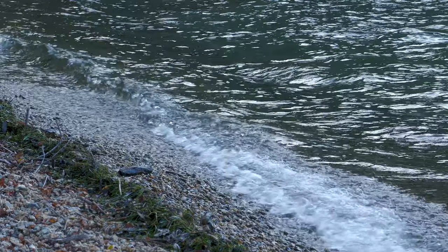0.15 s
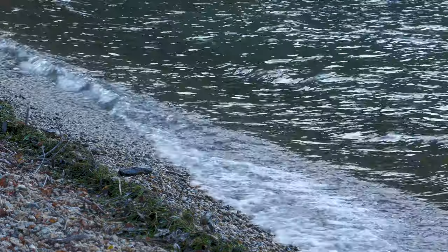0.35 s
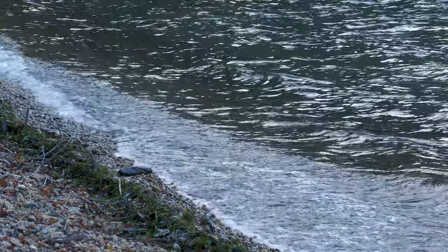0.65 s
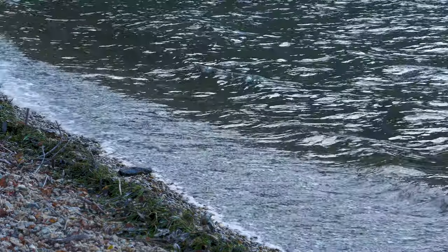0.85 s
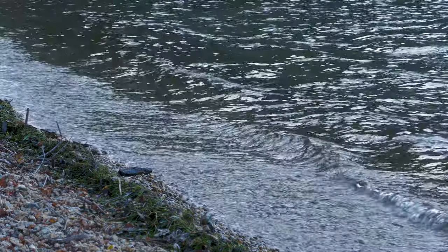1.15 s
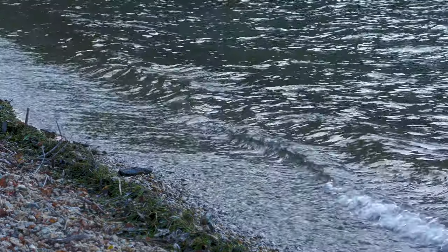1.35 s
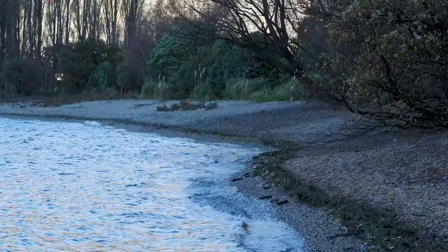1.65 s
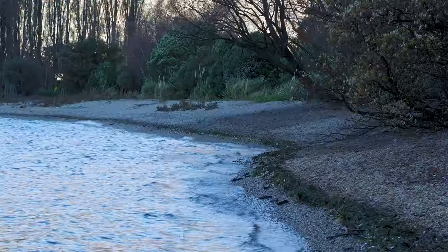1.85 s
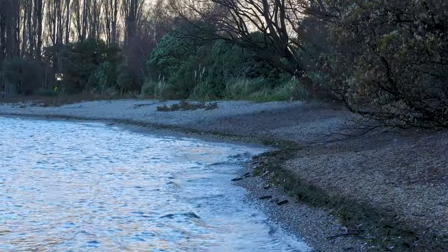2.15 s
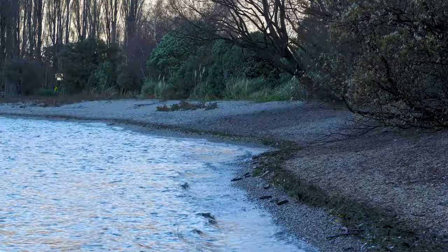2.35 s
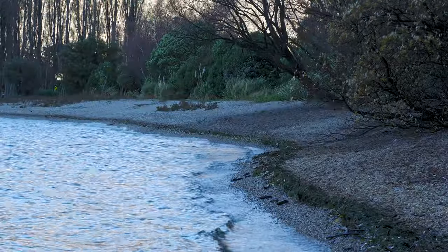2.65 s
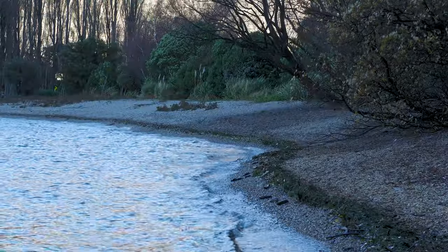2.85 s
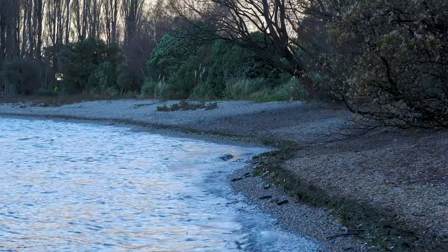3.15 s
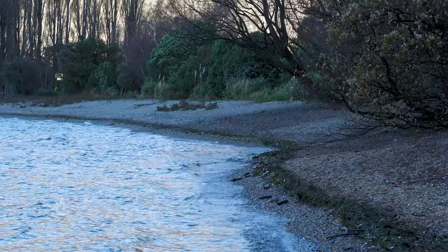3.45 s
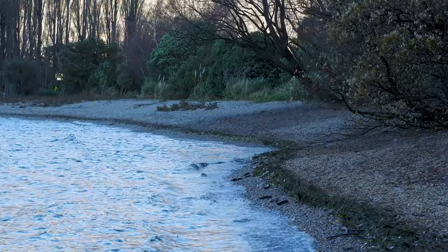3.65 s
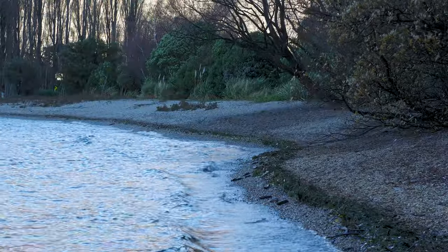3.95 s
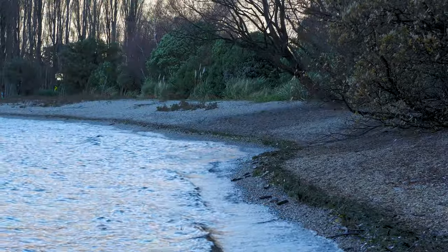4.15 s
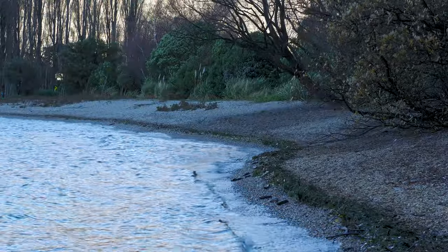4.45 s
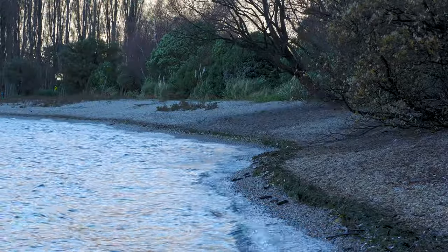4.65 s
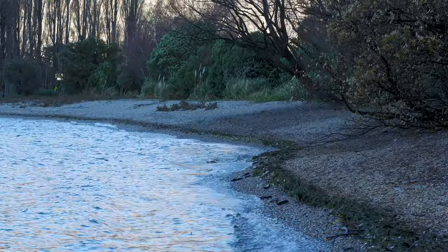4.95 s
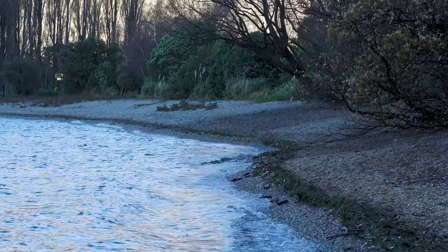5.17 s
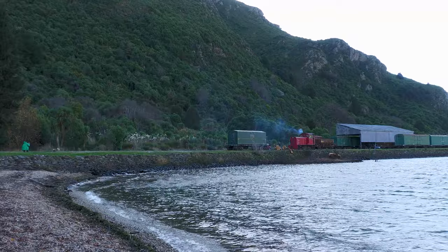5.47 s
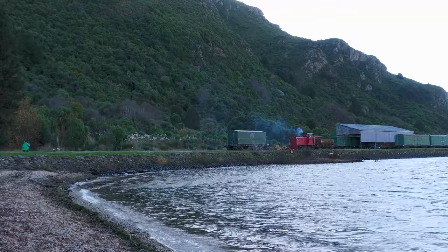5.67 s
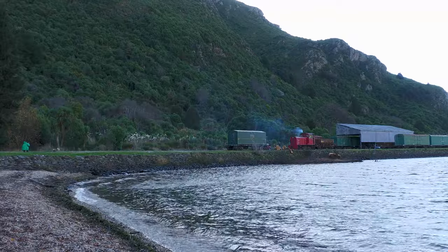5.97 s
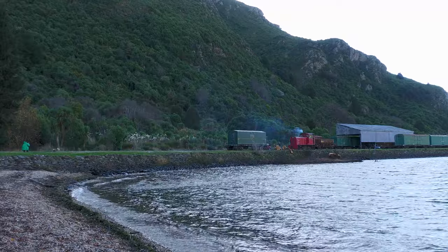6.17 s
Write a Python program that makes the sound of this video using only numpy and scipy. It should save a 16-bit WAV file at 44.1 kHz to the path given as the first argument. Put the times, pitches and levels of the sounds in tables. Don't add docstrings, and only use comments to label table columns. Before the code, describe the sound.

Gentle waves fold, wash up pebbles and fall back in foamy hisses, while deep gusty wind rumbles constantly against the mic.

```python
import sys
import numpy as np
from scipy import signal
from scipy.fft import rfft, irfft, next_fast_len
from scipy.io import wavfile
from scipy.ndimage import uniform_filter1d, map_coordinates

SR = 44100
rng = np.random.default_rng(int(sys.argv[2]) if len(sys.argv) > 2 else 0)


def volts_from_db(level):
    exponent = np.asarray(level, float) / 20
    return 10 ** exponent


def dump(signal):
    limited = np.clip(np.atleast_2d(signal).T, -1, 1)
    pcm = np.round(limited * 32767).astype(np.int16)
    wavfile.write(sys.argv[1], SR, pcm)


N = 278666

# (time [s], slosh level [dB], build-up [s], decay [dB/s])
BREAKERS = [
    (0.02, -33, .3, 13),
    (1.62, -37.5, 0.34, 15),
    (3.0, -39.5, 0.34, 12),
    (4.3, -36, 0.33, 14.5),
    (6.15, -39.5, .45, 18),
]
# (time [s], extra slosh [dB])
SLAPS = [
    (0.1, 1),
    (0.27, 2),
    (0.55, 3),
    (2.97, 1),
    (3.05, 2),
    (4.15, 1),
    (4.32, 4.5),
    (4.58, 3.5),
    (4.66, 3),
    (5.95, 3.5),
]
# (time [s], level [dB])
WASH = [(0.0, -37), (0.56, -41.5), (1.07, -49), (1.35, -47), (1.53, -40.5), (1.9, -42.5), (2.39, -55.5),
        (2.85, -43), (3.01, -42), (3.82, -51), (4.05, -41.5), (4.42, -41), (4.93, -46.5), (5.16, -51.5),
        (5.49, -56), (5.81, -48), (6.27, -44.5), (6.32, -48)]
# (time [s], extra spray [dB], half length [s])
SPLASHES = [(0.05, 1, 0.23), (0.5, 2.5, 0.31), (1.45, 1, 0.045), (1.69, 3.5, .15), (2.8, 4, .04),
            (3.03, 5, .03), (3.99, 4, .05), (4.35, 3.5, 0.12), (4.62, 3.5, 0.045), (4.9, 2.5, .15),
            (5.85, 2, .04), (6.22, 0, .05)]
# (frequency [Hz], density [dB/Hz])
SLOSH_SPECTRUM = [(200, -14), (350, -0.5), (640, 0), (950, -4), (1300, -9), (2000, -33)]
# (frequency [Hz], density [dB/Hz])
FOAM_SPECTRUM = [(700, -4), (1100, -2.5), (1490, -1), (1800, -5), (3480, -7), (4430, -17), (6000, -32),
                 (8000, -55)]
# (frequency [Hz], density [dB/Hz])
SPRAY_SPECTRUM = [(3000, -30), (4500, -3.5), (5500, -1), (7000, -5), (9000, -11), (12000, -28)]
# (frequency [Hz], density [dB/Hz])
MIST_SPECTRUM = [(5500, -23), (8000, -2.5), (10000, 0), (12300, -2), (15700, -7)]
# (frequency [Hz], density [dB/Hz])
FAR_SPECTRUM = [(500, -28), (800, -3), (1100, 0.5), (1450, 3), (1750, -1), (3500, -20.5), (4500, -39)]
# (time [s], peak [dB], frequency [Hz])
DROPS = [(0.1976, -39, 12780), (0.2726, -24, 1950), (0.3976, -45, 6190), (0.5877, -42, 6570),
         (0.9648, -49, 6710), (1.1724, -32, 2190), (1.2661, -42, 5460), (1.4215, -25, 1120),
         (1.8398, -43, 9420), (2.2359, -38, 3420), (2.5053, -36, 686), (2.5881, -46, 5430),
         (2.638, -31, 2920), (2.638, -32.5, 3700), (2.6629, -33, 2070), (2.7642, -39, 7300),
         (2.868, -44, 11750), (3.0062, -40, 6390), (3.0304, -29, 3250), (3.2411, -44.5, 6460),
         (3.6582, -42, 4230), (3.8223, -33, 1050), (3.9301, -34, 3680), (4.1386, -26.5, 646),
         (4.2319, -39, 6200), (4.3113, -22, 520), (4.3218, -20.5, 425), (5.3513, -36, 2460),
         (5.7967, -26.5, 1040), (5.8452, -42, 6450)]
# (time [s], peak [dB])
TICKS = [(0.9632, -39), (1.265, -46), (2.7626, -36), (2.7954, -47), (3.0285, -46), (4.0344, -49),
         (4.3134, -46), (4.6254, -57), (5.8444, -50), (6.2074, -49)]
# (time [s], level [dB])
WIND = [(0.0, -32), (0.28, -31), (0.37, -34), (0.44, -35), (1.37, -34.5), (1.41, -29.5), (2.62, -31),
        (2.66, -37), (2.76, -28), (2.87, -29.5), (3.4, -26), (3.43, -30.5), (3.68, -27), (6.18, -35),
        (6.28, -29.5), (6.32, -38)]
# (time [s], level change [dB])
GUSTS = [(0.3, -1), (0.37, -10), (0.44, 0.5), (0.6, 6), (0.67, -5), (0.88, 3.5), (1.14, -6), (1.25, 5),
         (1.43, 4.5), (1.49, -4), (1.94, 4), (2.69, 8.5), (2.76, 4), (3.11, 3.5), (3.31, -1), (3.43, 2),
         (3.87, -6), (4.08, 2), (4.19, 5), (4.28, 1), (4.87, 3.5), (4.93, -7), (5.01, 7.5), (5.45, -4),
         (5.6, -8), (6.3, 6)]
# (time [s], depth [dB])
LULLS = [(0.44, 0), (0.72, 7), (1.2, 1), (1.37, 2.5), (2.66, -1), (3.82, 4), (4.01, 2.5), (4.14, 2.5),
         (4.52, 4.5), (4.63, 9), (5.23, 0.5), (5.45, 2)]
# (frequency [Hz], density [dB/Hz])
BUFFET_SPECTRUM = [(12, -40), (27, -8.5), (50, -0.5), (85, 7.5), (120, 2), (170, -11.5), (250, -58)]
# (frequency [Hz], density [dB/Hz])
FLUTTER_SPECTRUM = [(70, -55), (120, -1.5), (190, -3), (280, -10.5), (420, -21), (800, -35), (1500, -68)]
# (frequency [Hz], density [dB/Hz])
HISS_SPECTRUM = [(2000, -22), (5000, 2), (10000, -1), (15700, -2)]
# (frequency [Hz], level [dB rms])
WHINE = [(15601, -85), (15649, -85)]

MID_WASH_DB, MID_WIND_DB = -45, -31


def waves():
    wash_db, = curves(WASH)
    flung_db = bumps(SPLASHES)
    slap_db = bumps(SLAPS, half_s=0.027)
    surge = 0.5 * wobble(14) + 0.65 * wobble(45)
    return (slosh(slap_db, surge)
            + foam(wash_db, slap_db, surge)
            + spray(wash_db - MID_WASH_DB, flung_db, surge)
            + mist(wash_db - MID_WASH_DB, flung_db, surge)
            + far_waves())


def slosh(slap_db, surge):
    grains = bubbles(count=4000, low_hz=302.0, high_hz=1390, cycles=3.57, scatter_db=0.7, rise=0.17, size=600)
    body = mixed(patchy(0.28, size=(2, 10)), grains, 0.15)
    level_db = folding() + slap_db + 0.5 + 0.18 * surge
    return volts_from_db(level_db) * coloured(body, SLOSH_SPECTRUM)


def folding():
    climb_db, crest_s = 11.5, 0.21
    t = np.arange(N) / SR
    power = 0
    for s, db, build_s, decay_db_per_s in BREAKERS:
        below_db = np.where(t < s, climb_db * (s - t) / build_s, decay_db_per_s * (t - s))
        power = power + volts_from_db(2 * (db - below_db))
    return uniform_filter1d(10 * np.log10(power), size=int(crest_s * SR), mode="nearest")


def foam(wash_db, slap_db, surge):
    grains = bubbles(count=16000, low_hz=895, high_hz=5030, cycles=4.23, scatter_db=2.5, rise=0.19, size=250)
    body = mixed(patchy(0.73), grains, 0.16)
    level_db = wash_db + 0.23 * slap_db + 3.0 + 0.21 * surge
    return volts_from_db(level_db) * coloured(body, FOAM_SPECTRUM)


def spray(swing_db, flung_db, surge):
    grains = bubbles(count=5000, low_hz=3500, high_hz=9800, cycles=3.6, scatter_db=2.5, rise=0.094, size=100)
    body = mixed(patchy(1.2, size=(20, 3)), grains, 0.15)
    level_db = MID_WASH_DB - 14.5 + 1.18 * swing_db + 0.72 * flung_db
    return volts_from_db(level_db - 3.0 + 1.4 * surge) * coloured(body, SPRAY_SPECTRUM)


def mist(swing_db, flung_db, surge):
    grains = bubbles(count=5000, low_hz=7000, high_hz=16000, cycles=3.7, scatter_db=5.0, rise=.1, size=60)
    body = mixed(patchy(0.99, size=(30, 2)), grains, 0.18)
    level_db = MID_WASH_DB - 21.5 + 1.05 * swing_db + 1.05 * flung_db
    return volts_from_db(level_db - 2.0 + 1.2 * surge) * coloured(body, MIST_SPECTRUM)


def far_waves():
    return volts_from_db(-50.5 + 0.69 * wobble(1.74)) * coloured(patchy(0.29), FAR_SPECTRUM)


def drops():
    shortest_ms, ring_cycles = 0.64, 9.1
    out, t = np.zeros(N + 4096), np.arange(-2048, 2048) / SR
    for s, db, hz in DROPS:
        length_ms = shortest_ms + 1e3 * ring_cycles / hz
        u = t / (length_ms * 0.00025)
        shape = np.exp(-np.where(u < 0, 2.5, .8) * u ** 2)
        bend = 1 + 0.0097 * np.clip(u, -3, 3)
        out[round(s * SR):][:4096] += volts_from_db(db - 1.5) * shape * np.sin(2 * np.pi * hz * t * bend)
    return out[2048:N + 2048]


def cracks():
    out, t = np.zeros(N + 256), np.arange(256) / SR
    for s, db in TICKS:
        out[round(s * SR):][:256] += volts_from_db(db - 2 - 60 * t / .006) * rng.standard_normal(256)
    return signal.sosfilt(signal.butter(4, 6500, "high", fs=SR, output="sos"), out[:N])


def wind():
    wind_db, = curves(WIND)
    gust_db = bumps(GUSTS, half_s=0.041)
    buffet_db = MID_WIND_DB - 2 + 0.56 * (wind_db - MID_WIND_DB) + gust_db
    flutter_db = wind_db + 1.5 + 0.14 * gust_db - bumps(LULLS, half_s=0.023)
    eddies = 0.62 * wobble(16)
    buffet = steady(coloured(rng.standard_normal(N), BUFFET_SPECTRUM), .12)
    flutter = steady(coloured(rng.standard_normal(N), FLUTTER_SPECTRUM), .09)
    return (volts_from_db(buffet_db + 0.3 + eddies) * buffet
            + volts_from_db(flutter_db - 0.38 + 0.38 * eddies + 0.7 * wobble(25)) * flutter)


def bubbles(count, low_hz, high_hz, cycles, scatter_db, rise, size):
    when, pitch, life, luck = rng.random((count, 4)).T[:, :, None]
    hz = low_hz * (high_hz / low_hz) ** pitch
    turns = hz * np.arange(size) / SR
    age = turns / (cycles * (.5 + life))
    strength = volts_from_db(scatter_db * np.minimum(-np.log(1 - luck), 4.5)) * hz
    ring = strength * age * np.exp(-3 * age) * np.sin(2 * np.pi * turns * (1 + rise * age / 2))
    at = (when * N).astype(int) + np.arange(size)
    return unit(np.bincount(at.ravel(), ring.ravel(), N)[:N])


def patchy(patchy_db, size=(6, 10)):
    z = signal.stft(rng.standard_normal(N + 512), nperseg=256)[2]
    field = uniform_filter1d(rng.standard_normal(z.shape), size[0], 0)
    field = uniform_filter1d(field, size[1], 1)
    return unit(signal.istft(z * volts_from_db(patchy_db * unit(field)), nperseg=256)[1][:N])


def mixed(noise, grains, share):
    share = np.clip(share, 0, 1)
    return np.sqrt(1 - share) * noise + np.sqrt(share) * grains


def coloured(x, spectrum):
    m = next_fast_len(N + 8192)
    hz, db = np.transpose(spectrum)
    gain = volts_from_db(np.interp(np.log(np.fft.rfftfreq(m, 1 / SR) + 1), np.log(hz), db, left=-120))
    return unit(irfft(rfft(x, m) * gain, m)[:N])


def steady(x, seconds):
    power = np.abs(uniform_filter1d(x ** 2, size=int(seconds * SR)))
    return unit(x / power ** 0.38)


def bumps(rows, half_s=None):
    t = np.arange(0, N, 64) / SR
    total = sum(db * np.exp(-((t - s) / (half_s or own[0])) ** 2) for s, db, *own in rows)
    return np.interp(np.arange(N) / SR, t, total)


def curves(rows):
    s, *cols = np.transpose(rows)
    return [np.interp(np.arange(N) / SR, s, c) for c in cols]


def wobble(rate_hz):
    knots = rng.standard_normal(int(N * rate_hz / SR) + 4)
    return map_coordinates(knots, [np.arange(N) * rate_hz / SR])


def unit(x):
    return x / np.sqrt(np.mean(x ** 2) + 1e-20)


def scene():
    return (waves() + drops() + cracks() + wind())[None]


def roll_off(x):
    return signal.sosfilt(signal.butter(12, 15920, fs=SR, output="sos"), x)


def record(dry):
    top_hz, dc_offset, overload = 15760, .0156, 0.36
    t = np.arange(N) / SR
    whine = sum(volts_from_db(db + 1.0) * np.sin(2 * np.pi * hz * t) for hz, db in WHINE)
    x = dry + volts_from_db(-66.5) * coloured(rng.standard_normal(N), HISS_SPECTRUM) + whine
    x = x / (1 + np.abs(x / overload) ** 3) ** (1 / 3)
    x = irfft(rfft(x) * (np.fft.rfftfreq(N, 1 / SR) < top_hz), N)
    return roll_off(x + dc_offset)


dry = scene()
out = record(dry)
dump(out)
```